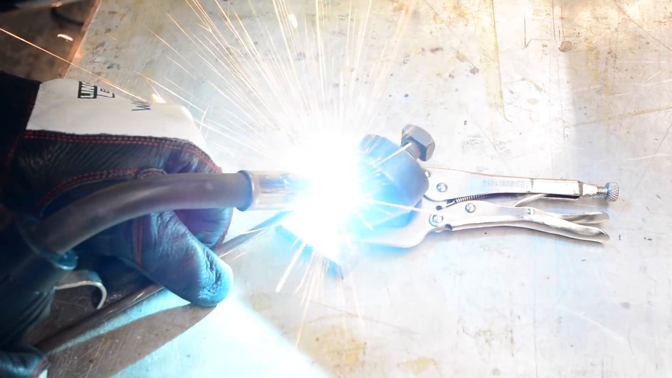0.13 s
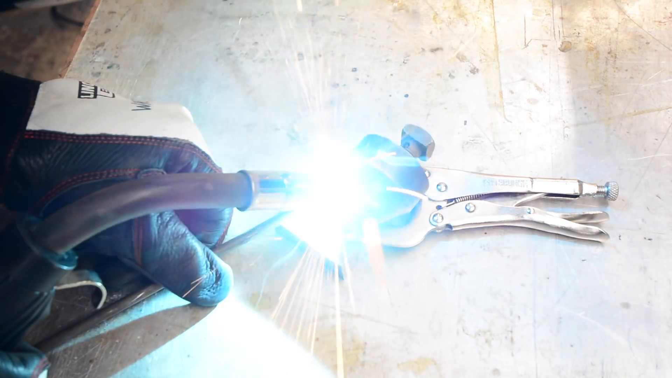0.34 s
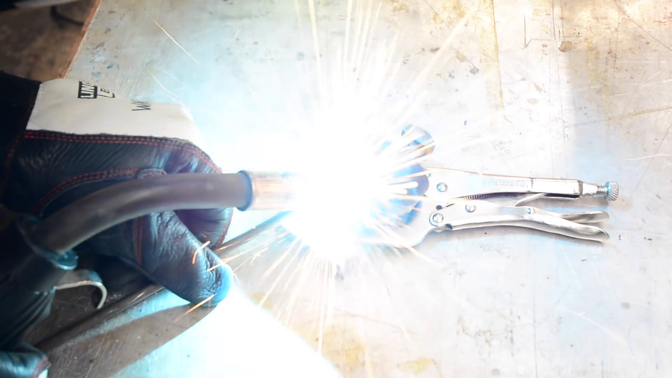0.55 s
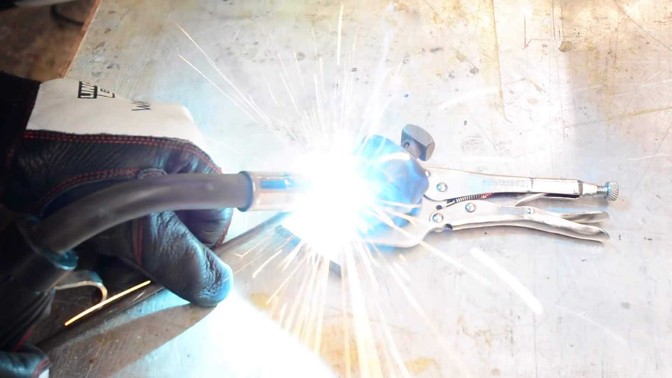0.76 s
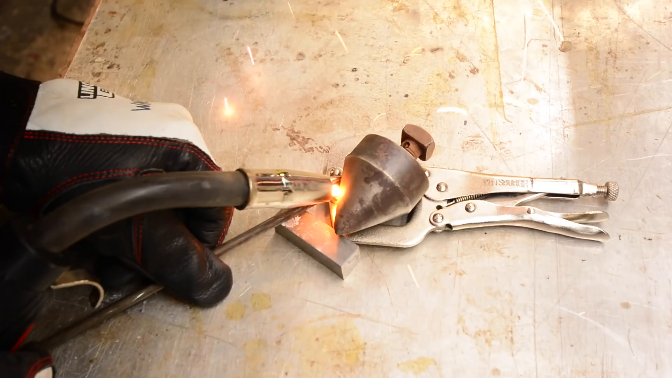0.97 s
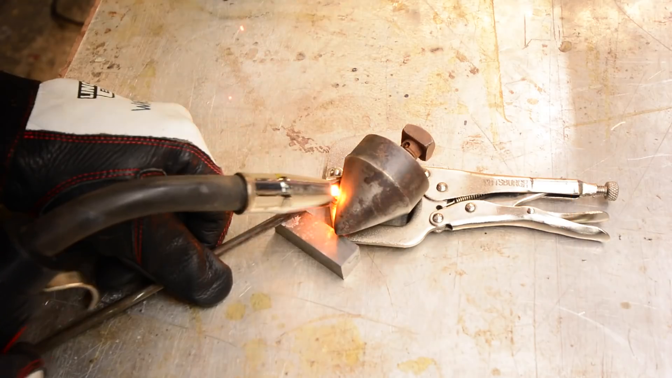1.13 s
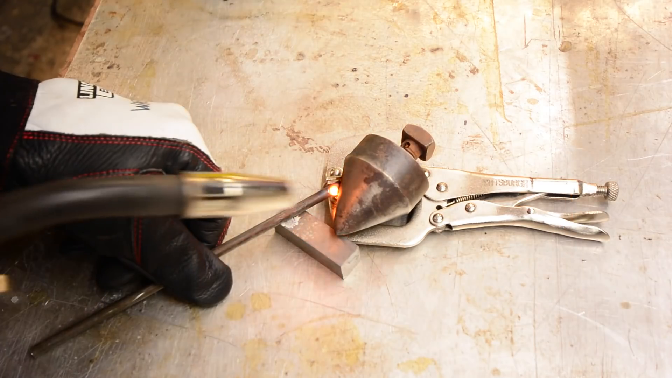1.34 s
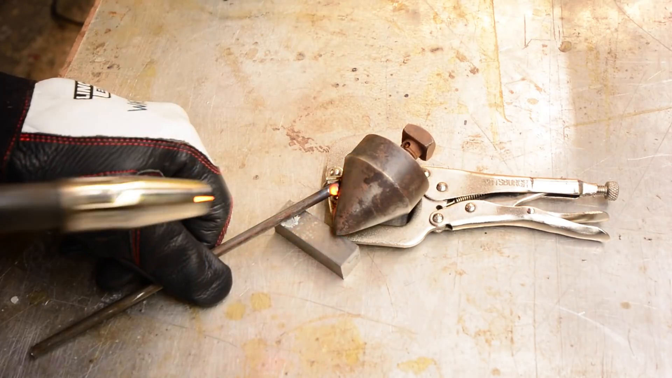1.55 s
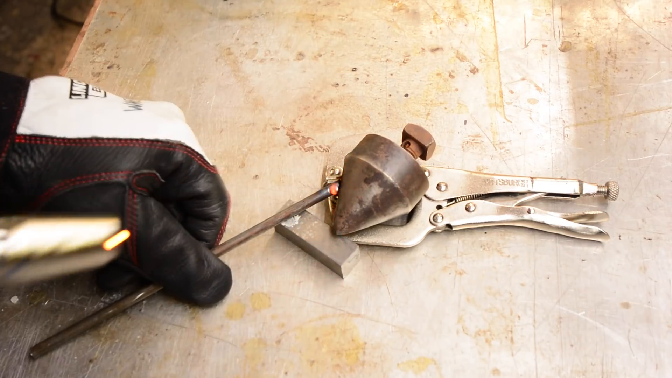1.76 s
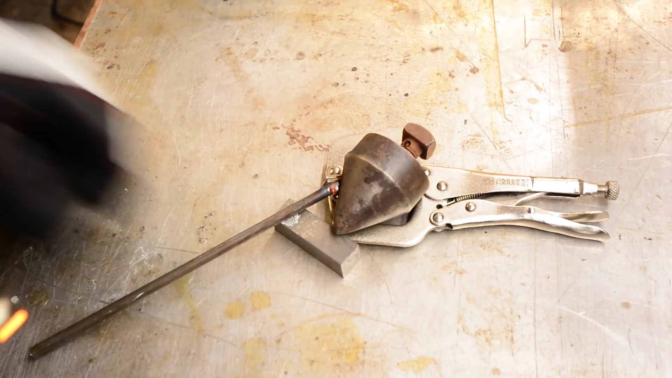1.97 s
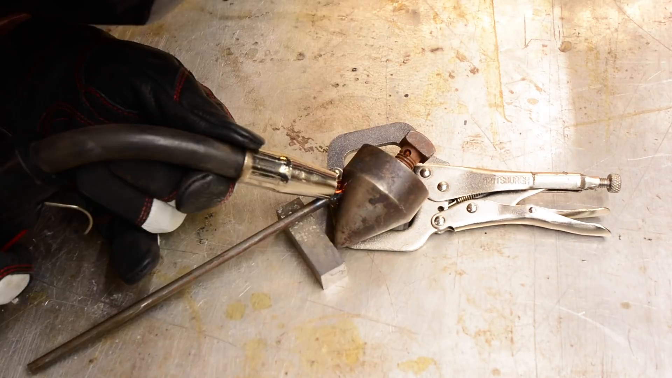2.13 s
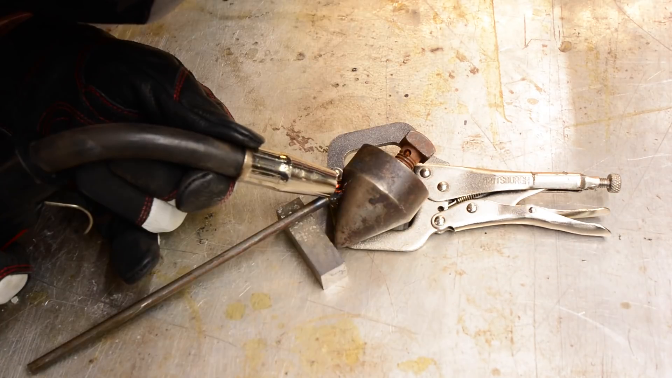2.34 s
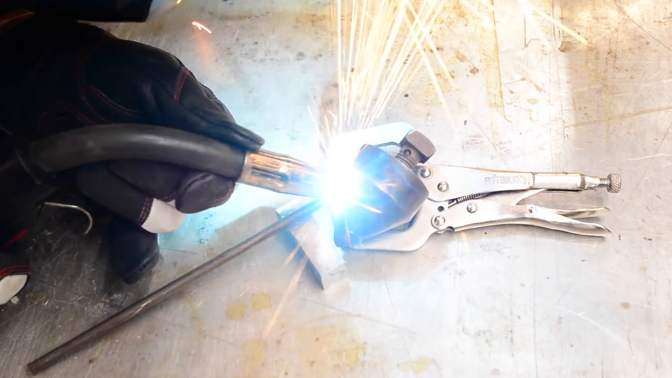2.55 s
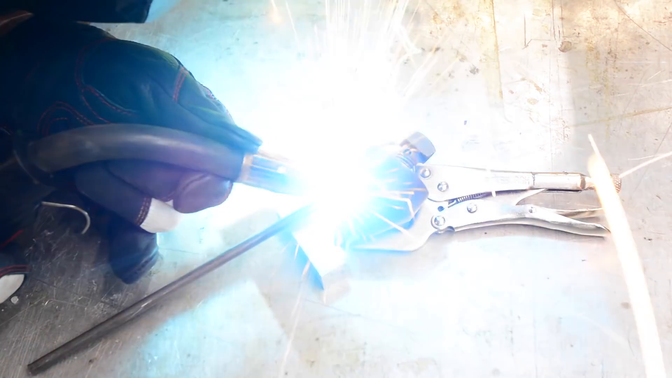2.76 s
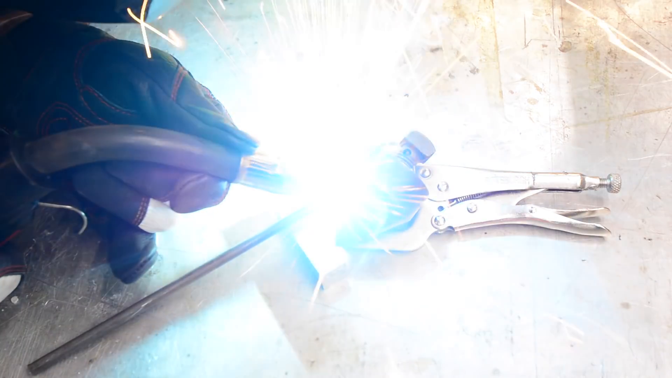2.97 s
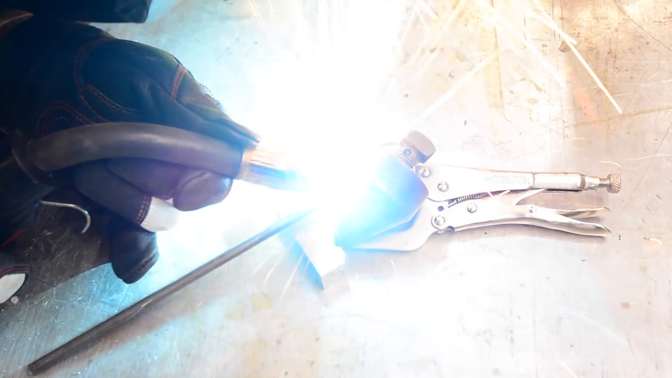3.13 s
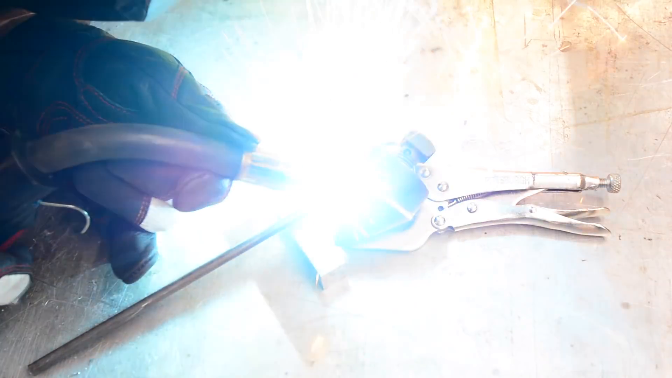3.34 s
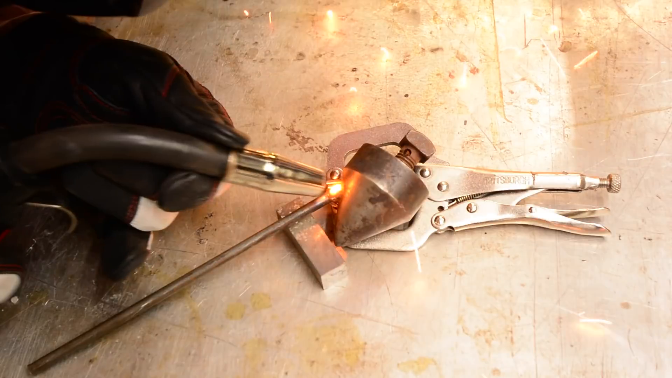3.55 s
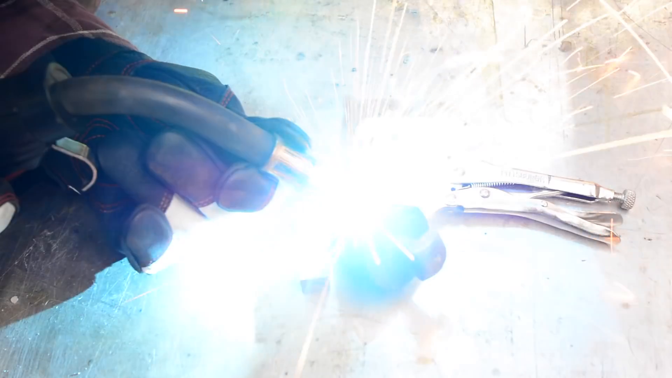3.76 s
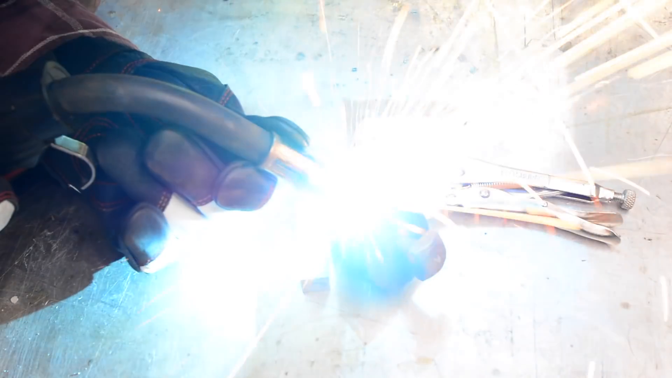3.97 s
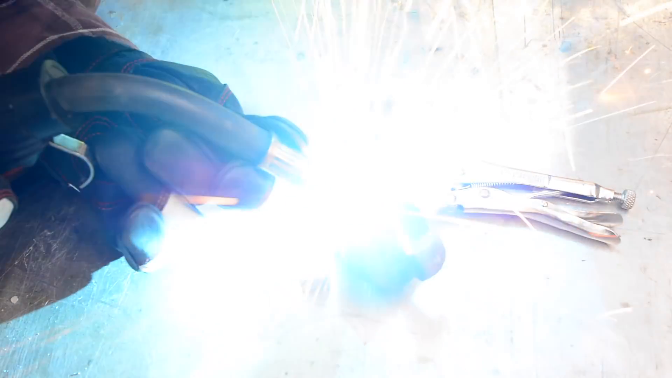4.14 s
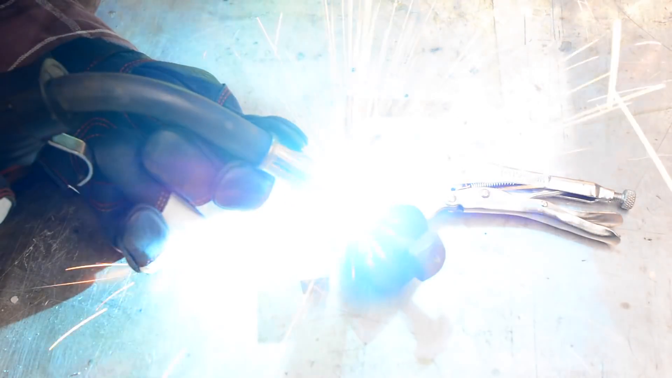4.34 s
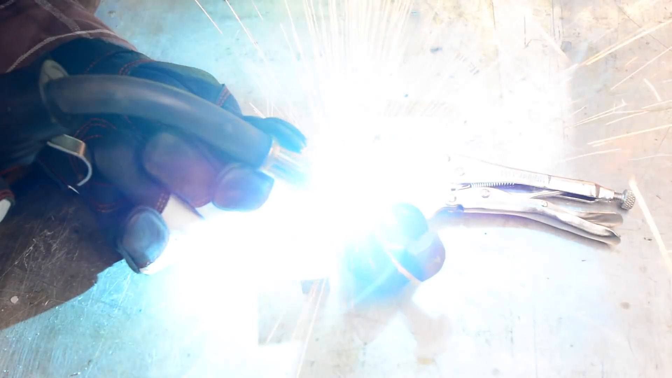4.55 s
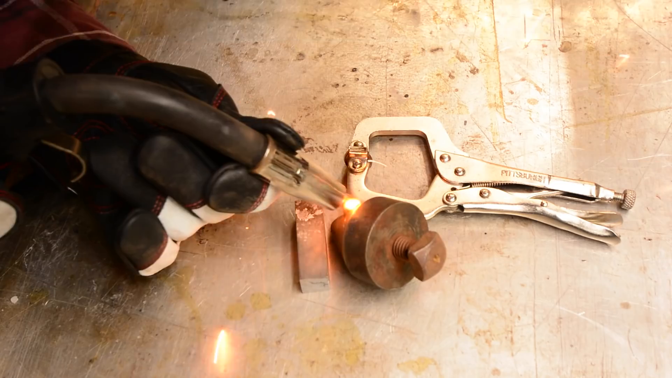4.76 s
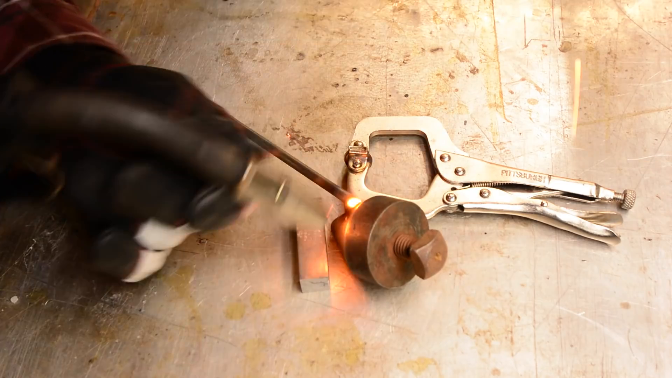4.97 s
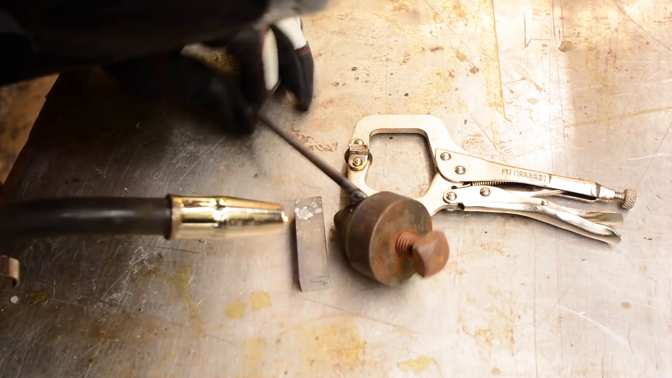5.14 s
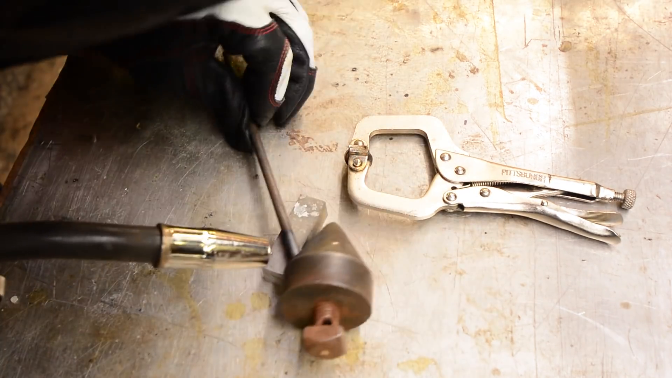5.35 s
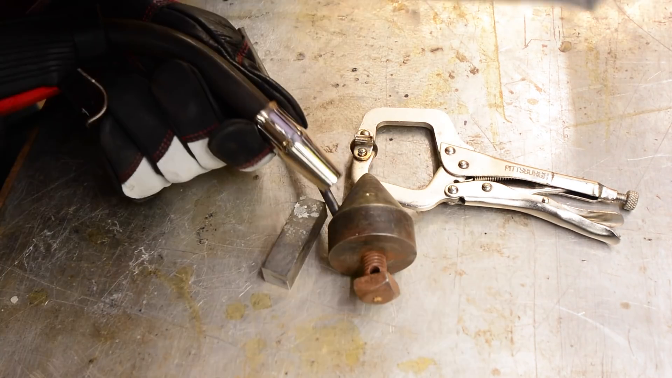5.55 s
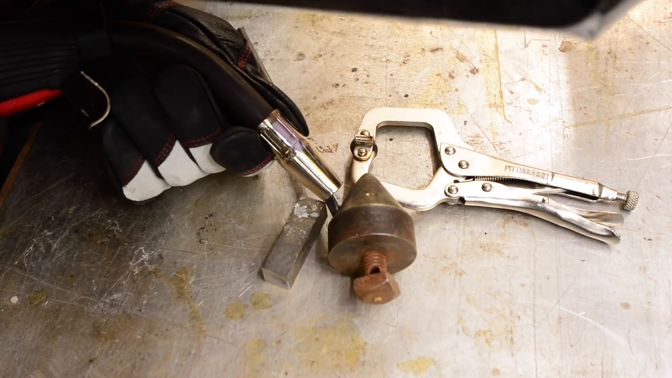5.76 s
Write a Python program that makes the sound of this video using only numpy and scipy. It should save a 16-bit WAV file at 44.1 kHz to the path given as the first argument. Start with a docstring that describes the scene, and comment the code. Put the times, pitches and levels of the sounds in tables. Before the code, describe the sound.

A wire-fed welder is heard close up in a workshop, already burning. From 0 to 0.98 s sharp, bright pops follow each other about every 10 ms, slightly uneven, each with fizz and a short ringing; a tiny gap comes near 0.22 s. Pops dull slightly as the weld goes on. Gas hiss lingers until 1.13 s, then only a quiet fan hum with a faint whine near 1 kHz that sags around 1.9 s, plus soft glove rubbing. At 2.3 s a light thump and a brighter surge of gas lead to a few separate cracks from 2.52 s, then dense crackling from 2.67 to 3.52 s. A third burst runs 3.8 to 4.8 s; gas stops about 4.95 s. At 5.05 s comes a click with a tiny gas puff and slightly louder hum, light rustling, then a hard metal knock and short rattle at 5.44 s. Quiet hum and a faint tick end it. Mono, short reverberation.

```python
"""Shielding gas hisses over the hum of a welder's fan, and at once sharp pops crackle in quick succession.
A wire-fed torch tacks steel parts on a bench in three bursts: each time a molten droplet breaks its short
circuit the arc relights with a crack, rings the joint and fizzes. The gas is filtered noise, the welder is
noise and steady tones, a pop is an impulse with damped resonances, echoes and a reverberant tail.
Rubbing gloves, a rattling part and small ticks are enveloped noise and short dying tones."""
import sys
import numpy as np
from scipy import signal
from scipy.fft import irfft
from scipy.io import wavfile
from scipy.ndimage import uniform_filter1d

SR = 44100
rng = np.random.default_rng(int(sys.argv[2]) if len(sys.argv) > 2 else 0)


def waveform_to_disk(signal):
    """Save audio, clipped to [-1, 1], as 16-bit WAV at the path in sys.argv[1]."""
    frames = np.transpose(np.atleast_2d(signal))
    scaled = np.clip(frames, -1, 1) * 32767
    samples = np.round(scaled).astype(np.int16)
    wavfile.write(sys.argv[1], SR, samples)


N = 260190  # samples in the scene


def gain_of(db):
    """Logarithmic level: decibels to amplitude."""
    return 10 ** (np.asarray(db) / 20)


def evened(x):
    """Power normalisation: scales to rms 1."""
    return x / np.sqrt(np.mean(x ** 2) + 1e-20)


def read(points, hz):
    """Spectral interpolation: a table read on a logarithmic frequency axis at hz."""
    f, value = np.transpose(points)
    return np.interp(np.log(hz + 1), np.log(f + 1), value)


def add(mix, s, sound):
    """Superposition: adds a sound into the mix at s seconds."""
    part = mix[round(s * SR):][:len(sound)]
    part += sound[:len(part)]


def held(start, stop, db, rise_s, fall_db_per_s):
    """Envelope: amplitude rises linearly at start, holds until stop, then decays exponentially."""
    t = np.arange(N) / SR
    rise = np.clip((t - start) / rise_s, 0, 1)
    return rise * gain_of(db - fall_db_per_s * np.maximum(t - stop, 0))


def hiss(colour, patchy_db, flicker_db):
    """Turbulence: noise of rms 1 from random short spectra; colour maps Hz to gain."""
    frames, hz = N // 128 + 5, np.fft.rfftfreq(512, 1 / SR)
    real, imaginary, patches = rng.standard_normal((frames, 257, 3)).T
    # patches span several frequencies and frames; the flicker moves whole frames
    patches = uniform_filter1d(patches, size=6, axis=0)
    patches = evened(uniform_filter1d(patches, size=14, axis=1))
    uneven_db = patchy_db * patches + flicker_db * rng.standard_normal(frames)
    spectra = (real + 1j * imaginary) * colour(hz)[:, None] * gain_of(uneven_db)
    return evened(signal.istft(spectra, nperseg=512, noverlap=384)[1][:N])


def jet(modes):
    """Pipe resonance: smooth flow noise coloured by the resonances of the nozzle."""
    # Smooth jet noise. Each row: frequency in Hz, relative level in dB.
    jet_spectrum = [(300, -10), (1000, -9), (2800, -17.5), (6800, -15), (11000, -11.5), (16000, -16)]

    def colour(hz):
        pipe = sum(gain_of(db) / (1 + (2 * (hz - f) / width) ** 2) for f, width, db in modes)
        return pipe + gain_of(read(jet_spectrum, hz))
    return hiss(colour, patchy_db=1.2, flicker_db=.6)


def gas():
    """Jet turbulence: steady flow, first surge and a low rush at the joint."""
    # Steady gas hiss. Each row: start and end in seconds, hiss and low rush in dB, fall in dB/s.
    stretches = [(0, 1.13, -41.5, -52, 750), (2.53, 3.655, -40.5, -47, 700), (3.798, 4.945, -41, -62, 750),
                 (5.049, 5.11, -35, -53, 5000)]
    # First gas surging out, nozzle close to the joint: opens and eases in seconds, hiss and rush in dB.
    opens, eases, hiss_db, rush_db = (2.311, 2.515, -31, -38)
    # Nozzle in steady flow. Each row: resonance in Hz, width in Hz, relative level in dB.
    steady_modes = [(3540, 650, -8), (4450, 400, -9), (5300, 540, -1.5), (8500, 400, -2.5), (9100, 1000, 1),
                    (12500, 1300, -10)]
    # Nozzle in the surge. Each row: resonance in Hz, width in Hz, relative level in dB.
    surge_modes = [(3530, 450, -6), (4450, 400, -8), (5500, 500, -4.5), (7900, 400, -0.5), (8700, 600, -2),
                   (9500, 700, -1), (10700, 500, -4.5), (12500, 1200, -4.5)]
    # Low rush: centre in Hz, width in Hz.
    rush_hz, rush_width_hz = (1480, 450)
    steady_rise_s, surge_rise_s = .002, .04
    surge_fall_db_per_s, rush_fall_db_per_s = 170, 200

    def band(hz):
        return 1 / (1 + (2 * (hz - rush_hz) / rush_width_hz) ** 2)
    rush = hiss(band, patchy_db=1.2, flicker_db=.6)
    flow = sum(held(a, b, db, steady_rise_s, fall) for a, b, db, _, fall in stretches)
    low = sum(held(a, b, db, steady_rise_s, fall) for a, b, _, db, fall in stretches)
    surge = held(opens, eases, hiss_db, surge_rise_s, surge_fall_db_per_s)
    low = low + held(opens, eases, rush_db, surge_rise_s, rush_fall_db_per_s)
    return flow * jet(steady_modes) + surge * jet(surge_modes) + low * rush


def welder():
    """Broadband and tonal machine noise: fan air, narrow noisy humps and slightly unsteady tones."""
    # Air noise of the fan. Each row: frequency in Hz, relative level in dB.
    air_spectrum = [(24, -65), (40, -26.5), (144, -23.5), (276, -5), (363, -28.5), (444, -16), (542, -19.5),
                    (1040, -17.5), (1410, -26.5), (2260, -27), (2440, -26.5), (3470, -23.5), (16000, -61)]
    # Broad fan humps. Each row: centre in Hz, level in dB before the common gain, width in Hz.
    humps = [(224.7, -56, 27), (267.7, -60.5, 9.2), (294, -56.5, 15)]
    # Steady motor and transformer tones: frequencies in Hz.
    tones_hz = [59.5, 120, 446.8, 764.4, 829, 909, 1018, 1039, 1082, 2229, 2270]
    # Their mean levels ahead of the common gain. Each row: dB before and dB after about 2 s,
    # when some tones fade and others shift in level.
    tone_levels = [(-80.5, -78), (-78.5, -78.5), (-63, -76), (-74.5, -74), (-76, -83), (-80, -80),
                   (-74, -78), (-66, -64.5), (-82, -81), (-76.5, -80), (-72.5, -74.5)]
    # The whine near 1 kHz sags: tone in Hz, start and end in seconds, drop in Hz.
    whine, dips, rises, drop = (1039, 1.73, 2.12, 19)
    # Hum sinks under the welds and is louder for half a second after 5.05 s.
    # Each row: start and end in seconds, change in dB.
    changes = [(0, 1.04, -4), (2.5, 3.56, -3), (3.8, 4.86, -9), (5.048, 5.55, 8), (5.55, 5.9, .6)]
    air_db, common_db = -62.5, 2.5  # air level ahead of the common gain
    tone_change_s = 2.05

    hz, t = np.fft.rfftfreq(N, 1 / SR), np.arange(N) / SR
    out = gain_of(air_db) * hiss(lambda f: gain_of(read(air_spectrum, f)), patchy_db=1.5, flicker_db=.8)
    for f, db, width in humps:
        noise = [1, 1j] @ rng.standard_normal((2, len(hz)))
        out += gain_of(db) * evened(irfft(noise / (1 + (2 * (hz - f) / width) ** 2), N))
    for f, (before_db, after_db) in zip(tones_hz, tone_levels):
        drift = np.interp(t, np.linspace(0, N / SR, 60), rng.standard_normal(60))
        start_turn = rng.random()
        db = np.interp(t, [tone_change_s, tone_change_s + .05], [before_db, after_db]) + 1.6 * drift
        lost_turns = (f == whine) * drop * np.clip(t - dips, 0, rises - dips)
        turns = f * t - lost_turns + 0.13 * drift + start_turn
        out += gain_of(db) * np.sqrt(2) * np.sin(2 * np.pi * turns)
    change_db = sum(db * ((t >= a) & (t < b)) for a, b, db in changes)
    return gain_of(common_db + uniform_filter1d(change_db, size=200)) * out


def droplets():
    """Short-circuit transfer: all pops as rows of time in s, level in dB, dullness in dB."""
    # Steady runs of droplets. Each row: first pop in seconds, pops, gap in ms, mean level in dB.
    runs = [(0.0077, 7, 9.26, -16.5), (0.0696, 5, 9.82, -16.0), (0.116, 7, 10.44, -16.0),
            (0.186, 3, 11.46, -16.0), (0.2313, 5, 10.82, -17.0), (0.2829, 5, 5.14, -17.0),
            (0.3159, 7, 12.34, -16.5), (0.3986, 10, 12.22, -16.0), (0.5212, 9, 13.39, -16.0),
            (0.6395, 7, 7.71, -16.0), (0.7007, 2, 7.76, -16.0), (0.7223, 2, 8.91, -15.5),
            (0.7447, 2, 11.13, -17.0), (0.7612, 4, 8.15, -15.5), (0.7998, 2, 13.76, -16.0),
            (0.8226, 3, 14.0, -15.5), (0.8594, 5, 13.74, -16.0), (0.9208, 4, 14.16, -16.5),
            (2.516, 1, 0.0, -24.0), (2.5284, 1, 0.0, -14.5), (2.6318, 1, 0.0, -13.5),
            (2.6739, 2, 10.77, -16.5), (2.6887, 2, 13.27, -18.0), (2.7125, 7, 9.59, -17.0),
            (2.7732, 8, 10.48, -16.5), (2.8609, 9, 10.54, -17.5), (2.9527, 11, 11.47, -16.0),
            (3.0763, 7, 9.99, -17.5), (3.1437, 5, 8.72, -16.5), (3.19, 2, 6.33, -16.0),
            (3.2037, 4, 16.37, -16.5), (3.2708, 2, 12.79, -17.0), (3.3007, 5, 10.51, -16.0),
            (3.3552, 3, 7.79, -16.0), (3.3857, 2, 12.31, -15.5), (3.4053, 2, 9.95, -17.0),
            (3.4298, 4, 8.5, -16.5), (3.4644, 3, 16.29, -16.5), (3.7998, 5, 11.48, -17.0),
            (3.8593, 8, 10.76, -16.0), (3.9401, 8, 12.23, -16.5), (4.0429, 8, 12.36, -16.5),
            (4.1458, 8, 10.33, -17.0), (4.2225, 7, 7.84, -16.5), (4.2823, 3, 11.21, -17.0),
            (4.3107, 3, 14.3, -16.0), (4.3606, 4, 12.63, -16.5), (4.4095, 6, 10.15, -17.5),
            (4.4629, 17, 10.38, -16.5), (4.6395, 9, 10.97, -17.0), (4.7429, 3, 17.54, -16.0)]
    # The welds. Each row: arc established in seconds, last pop in seconds.
    welds = [(0, .9821), (2.674, 3.5179), (3.7999, 4.8036)]
    # The two last pops of a weld, as the current dies: levels in dB.
    dying_levels = (-19.5, -17.5)
    dying_gap_s, dying_dull_db = .0099, 13
    jitter_ms, spread_db = .3, .9
    # pops start bright and dull as the pool grows
    fresh_dull_db, dulling_db_per_s, dull_spread_db = -1.5, 2.5, 1.1

    # only runs of more than two pops are jittered
    rows = [(s + k * gap_ms / 1000, db, count > 2)
            for s, count, gap_ms, db in runs for k in range(int(count))]
    s, db, even = np.transpose(rows)
    late, size, tone = rng.standard_normal((len(s), 3)).T
    starts, ends = np.transpose(welds)
    age_s = np.maximum(s - starts[np.searchsorted(ends, s)], 0)
    dull_db = fresh_dull_db + dulling_db_per_s * age_s + dull_spread_db * tone
    pop_s = s + even * late * jitter_ms / 1000
    burning_pops = np.transpose([pop_s, db + even * size * spread_db, dull_db])
    dying = [(end - ago, level, dying_dull_db)
             for end in ends for ago, level in zip((dying_gap_s, 0), dying_levels)]
    return np.vstack([burning_pops, dying])


def burning(drops, fizz_db=-17, fade_s=.005, touch_db=-9, spread_db=4.5):
    """Plasma noise: fizz decays after each pop; a small tick before it as the wire touches the pool."""
    # Fizz of the burning arc. Each row: frequency in Hz, relative level in dB.
    fizz = [(300, -14), (1500, -6), (3500, 1.5), (7000, -4.5), (11000, 0.5), (16000, -3.5)]
    t, lit, ticks = np.arange(N) / SR, np.zeros(N), np.zeros(N)
    chance = rng.random((len(drops), 2))
    grit = rng.standard_normal((len(drops), 21))
    for (s, db, dull_db), (early, size), rough in zip(drops, chance, grit):
        add(lit, s, gain_of(db + fizz_db - dull_db) * np.exp(-t[:2000] / fade_s))
        tick = evened(np.diff(rough)) * np.hanning(20)
        touch_s = s - .0015 - .003 * early
        add(ticks, touch_s, gain_of(db + touch_db - 2 * spread_db * size) * tick)
    return lit * hiss(lambda f: gain_of(read(fizz, f)), patchy_db=2.0, flicker_db=2.0) + ticks


def arc(drops, wander_s=.00002, wobble_db=1.7, hold=1.02, rise_cycles=0.55, step=0.419):
    """Impulse excitation: every pop is a crack followed by the damped resonances of its joint."""
    # Nozzle, clamp, parts and bench colour a pop; one table for each place of the torch.
    # Each row: nominal resonance in Hz, nominal width in Hz, relative level in dB per unit width.
    joints = [
        [(222, 470, 2), (633, 83, -13.5), (976, 430, -11), (1500, 220, -4.5), (2080, 250, -16),
         (2393, 300, -13), (2814, 220, -6), (3384, 425, 2), (3960, 260, -6.5), (4470, 80, -10), (4860, 240, -9),
         (5467, 550, -3.5), (6620, 140, -6.5), (7110, 280, -6), (7710, 1000, -7), (8600, 160, -11),
         (10020, 660, -2.5), (10250, 230, -10), (10950, 1100, -4.5), (11850, 120, -4), (12400, 170, -9),
         (11630, 440, -33), (13100, 300, -8.5), (14450, 500, -9), (13600, 570, -8.5), (13700, 180, -11.5),
         (15270, 170, -7)],
        [(222, 425, 1.5), (650, 87, -10.5), (910, 250, -16), (1360, 303, -1), (1750, 930, -9.5),
         (2220, 1020, -10), (2930, 118, -7.5), (3380, 490, 0), (3990, 140, -2.5), (4370, 1100, -5),
         (5100, 150, -8), (5640, 150, -8), (6070, 320, -11), (6930, 450, -15), (7280, 290, -6.5),
         (7915, 410, 3), (8770, 970, -14), (10150, 300, -8), (9740, 410, -3.5), (10630, 140, 1),
         (11160, 83, -8.5), (11560, 400, 0.5), (13900, 350, -5), (13000, 140, -12.5), (13400, 160, -20),
         (14620, 200, -4), (15500, 440, -18.5)],
        [(180, 310, 4), (609, 180, -8.5), (914, 240, -14.5), (1350, 337, -3.5), (2070, 300, -13.5),
         (2194, 310, -9.5), (3454, 590, 0), (4070, 240, -1.5), (4517, 340, 3), (5200, 230, -12), (5590, 380, 1),
         (6060, 280, -18), (6500, 430, -9), (7020, 200, -7), (7480, 130, -3.5), (8500, 510, 1),
         (9940, 100, 1.5), (11070, 550, 2.5), (12700, 400, -8), (13520, 490, 1.5), (13000, 160, -9.5),
         (14700, 220, -5.5), (15500, 330, -9), (15720, 270, -16.5), (9250, 500, -9), (11750, 450, -6),
         (14150, 400, -5)],
    ]
    # The torch moves on: times in seconds.
    torch_moves = [2.0, 3.7]
    crack_db = 9  # over the ringing, less the dullness

    t, rings, cracks = np.arange(400) / SR, np.zeros(N), np.zeros(N)
    chance = rng.standard_normal((len(drops), 3, 30))
    crack = (1 - t / .00004) * np.exp(-t / .00004)
    for (s, db, dull_db), (late, size, tune) in zip(drops, chance):
        hz, width, mode_db = np.transpose(joints[np.searchsorted(torch_moves, s)])[:, :, None]
        k = np.arange(len(hz))[:, None]
        # nothing here rings long
        width = np.maximum(width, 200 + hz / 80)
        # reflections keep arriving for a while, then stop rather suddenly
        shape = (1 - np.exp(-t * hz / rise_cycles)) * np.exp(-(width * t * hold) ** 3)
        # neighbouring resonances start nearly opposed, the lowest one inwards;
        # the arc wanders, so each path is a little early or late and a little detuned
        turns = .5 + step * k + hz * ((1 + 0.008 * tune[k]) * t + wander_s * late[k])
        treble_loss_db = dull_db * np.clip(np.log2(hz / 2500), 0, 1)
        strength = gain_of(mode_db + wobble_db * size[k] - treble_loss_db) * width * shape
        ring = (strength * np.sin(2 * np.pi * turns)).sum(0)
        # the pop's level is the rms of its first 3 ms of ringing
        add(rings, s, gain_of(db) * ring / np.sqrt(np.mean(ring[:130] ** 2)))
        add(cracks, s, gain_of(db + crack_db - dull_db) * crack)
    return rings, cracks


def echoes(cracks):
    """Diffuse reflection: single bright echoes, each smeared over about half a millisecond."""
    # Echoes of each crack off nearby uneven things. Each row: delay in seconds, level in dB.
    nearby = [(.0045, -12.5), (.0067, -3.5), (.0095, -14), (.012, -14.5)]
    taps = np.zeros(800)
    for delay, db in nearby:
        rough = np.diff(rng.standard_normal(31)) * np.hanning(30)
        add(taps, delay, gain_of(db) * rough / np.linalg.norm(rough))
    return signal.fftconvolve(cracks, taps)[:N]


def shop(x):
    """Reverberation: sparse taps of random sign, each band dying at its own speed."""
    # Decay of the workshop. Each row: frequency in Hz, time to fall 60 dB in seconds.
    decay = [(60, .06), (250, 0.25), (1000, .15), (4000, 0.18), (15000, 0.047)]
    tail_db = -14.5
    taps = np.zeros(SR // 2)
    at = np.arange(120, SR // 2 - 20, 12)
    taps[at + rng.integers(0, 12, len(at))] = rng.choice([-1., 1.], len(at))
    hz, t, z = signal.stft(taps, SR, nperseg=128)
    fading = gain_of(-60 * t / read(decay, hz)[:, None])
    tail = signal.istft(z * fading, SR, nperseg=128)[1]
    tail = gain_of(tail_db) * tail / np.linalg.norm(tail)
    return signal.fftconvolve(x, tail)[:N]


def handling():
    """Friction and impact: rubbing, a rattling part and ticks, each tick a short dying tone; the tick at 0.2265
    s is the wire touching the pool just before a pop."""
    # Gloves and cable rub. Each row: start and end in seconds, level in dB.
    rustles = [(1.91, 2.028, -54.5), (5.09, 5.548, -57.5)]
    # Rub of the glove. Each row: frequency in Hz, relative level in dB.
    glove = [(300, -20), (800, 2), (1800, -0.5), (3000, 6), (4200, -5), (8000, -12.5), (16000, -16)]
    # A part set down rattles to rest. Each row: start and end in seconds, level in dB, fall in dB/s.
    rattles = [(5.4335, 5.435, -37, 700), (5.444, 5.47, -31.5, 430), (5.47, 5.548, -53, 3000)]
    # Part against bench. Each row: frequency in Hz, relative level in dB.
    bench = [(150, -10), (300, -6), (600, -8), (1100, -2.5), (2500, -5.5), (3600, -5), (4600, -17),
             (16000, -31.5)]
    # Small ticks and knocks. Each row: start in seconds, level in dB, frequency in Hz, decay in cycles.
    knocks = [(2.195, -58, 9100, 8), (2.231, -48.5, 10800, 10), (2.321, -27, 200, 0.57),
              (2.516, -40, 250, 1.8), (5.049, -21, 5900, 1.2), (5.24, -48, 2670, 22),
              (5.4415, -17, 900, 3.4), (5.4415, -20, 1820, 5.1), (1.923, -48, 1000, 2),
              (5.052, -50, 1066, 25), (.2265, -24, 9000, 3), (5.007, -54, 11000, 10),
              (5.769, -41.5, 2300, 3)]
    rub_rise_s, rub_fall_db_per_s = .02, 900

    rub = sum(held(*row, rub_rise_s, rub_fall_db_per_s) for row in rustles)
    rattle = sum(held(a, b, db, .002, fall) for a, b, db, fall in rattles)
    out = rub * hiss(lambda f: gain_of(read(glove, f)), patchy_db=2.5, flicker_db=2.0)
    out += rattle * hiss(lambda f: gain_of(read(bench, f)), patchy_db=2.0, flicker_db=2.0)
    for s, db, hz, cycles in knocks:
        turns = np.arange(1200) / SR * hz
        add(out, s, gain_of(db) * np.sin(2 * np.pi * turns) * np.exp(-(turns / cycles) ** 2))
    return out


def scene():
    """Superposition: pops with their echoes over gas, hum and handling."""
    # The arc goes out once: start and end in seconds.
    goes_out, relights = (.2125, .23)
    drops = droplets()
    rings, cracks = arc(drops)
    pops, t = rings + cracks, np.arange(N) / SR
    out = (t > goes_out) & (t < relights)
    # while the arc is out, echoes, tail, fizz and touch ticks are 7 dB quieter
    quieting = gain_of(-7 * uniform_filter1d(out * 1., size=60))
    after = (echoes(cracks) + shop(pops) + burning(drops)) * quieting
    return (pops + after + gas() + welder() + handling())[None]


def record(dry):
    """Transduction: microphone self-noise and bass cut, soft overload on the pops, then the band limit."""
    self_noise_db, bass_cut_hz, edge_hz = -76, 28, 15800
    knee = .65  # amplitude at which the microphone overloads
    mic = dry + gain_of(self_noise_db) * rng.standard_normal(dry.shape)
    mic = signal.lfilter(*signal.butter(2, bass_cut_hz, "high", fs=SR), mic)
    loud = knee * np.tanh(mic / knee)
    low_pass = signal.firwin(511, edge_hz, window=("kaiser", 9), fs=SR)
    return signal.oaconvolve(loud, low_pass[None], "same")


dry = scene()
out = record(dry)
waveform_to_disk(out)
```